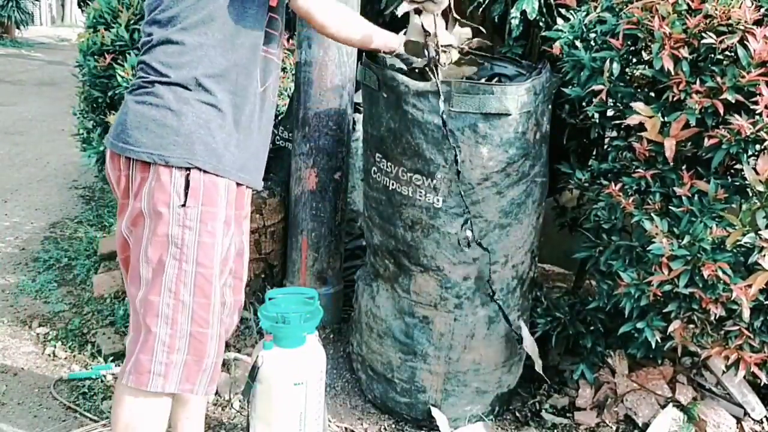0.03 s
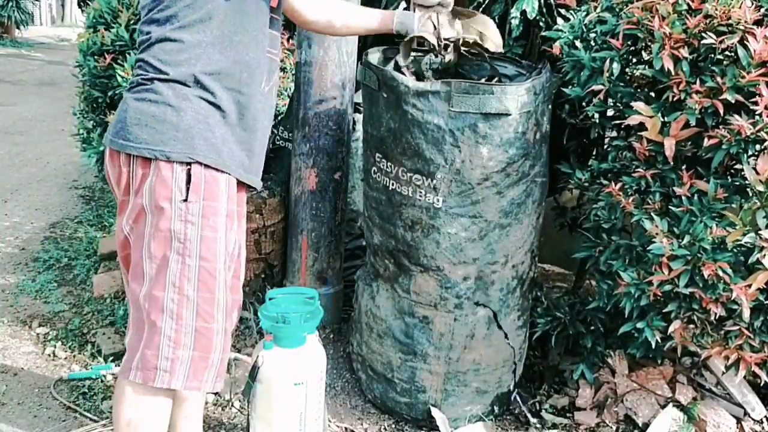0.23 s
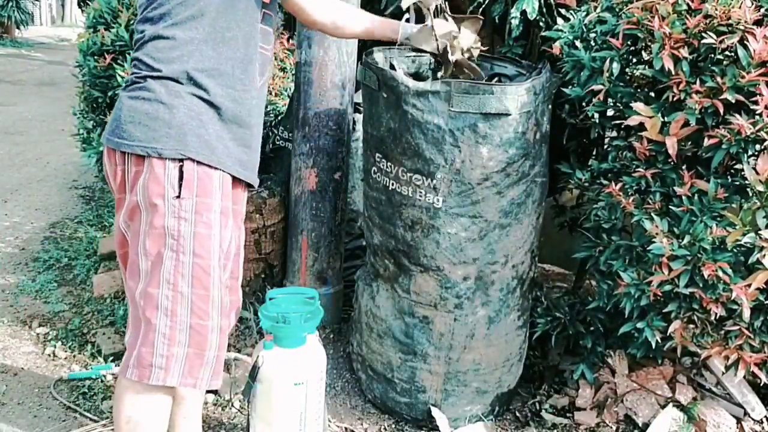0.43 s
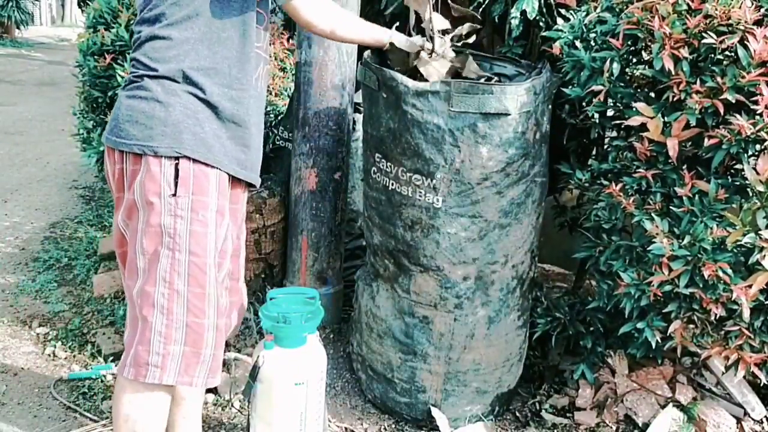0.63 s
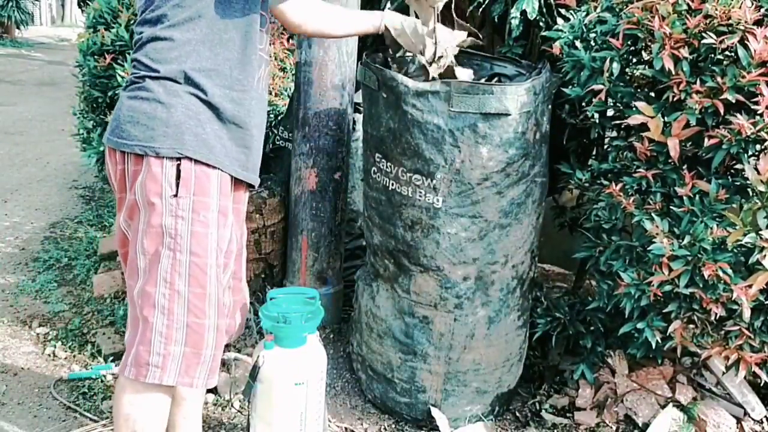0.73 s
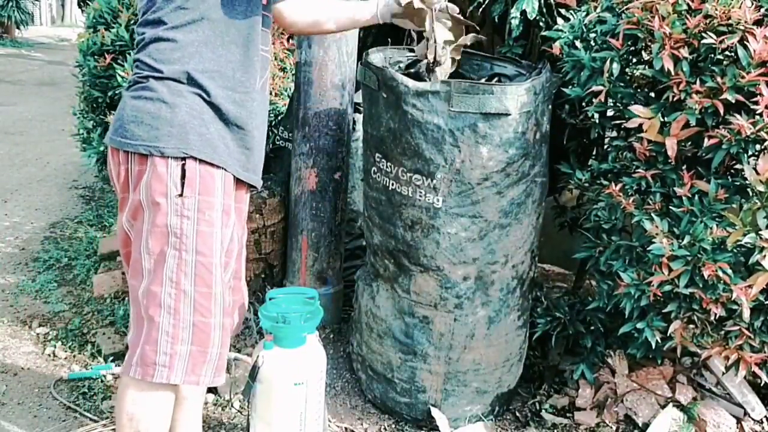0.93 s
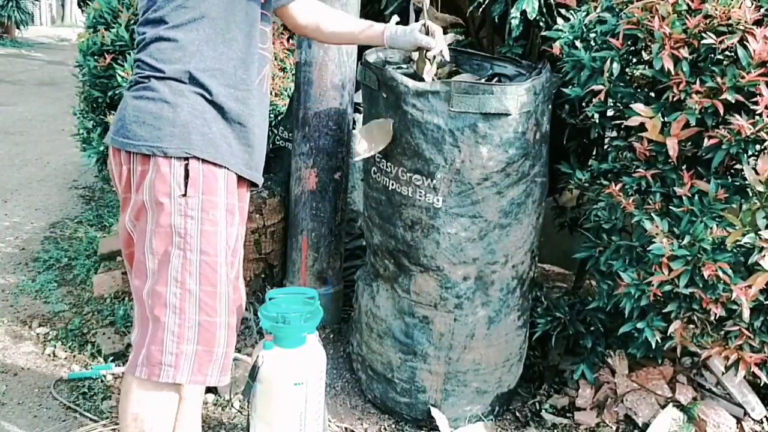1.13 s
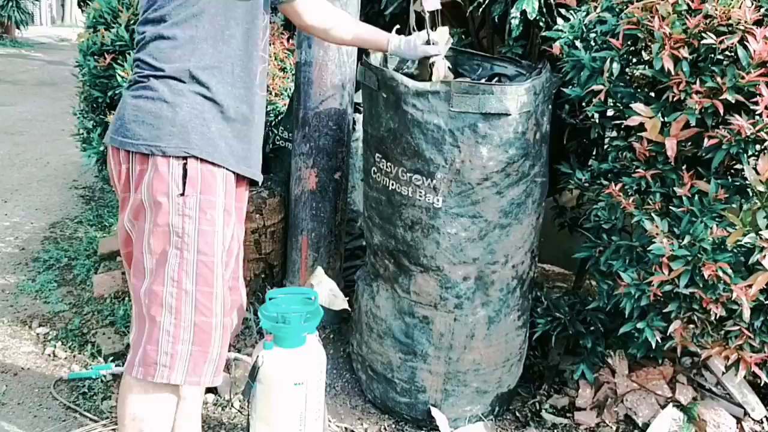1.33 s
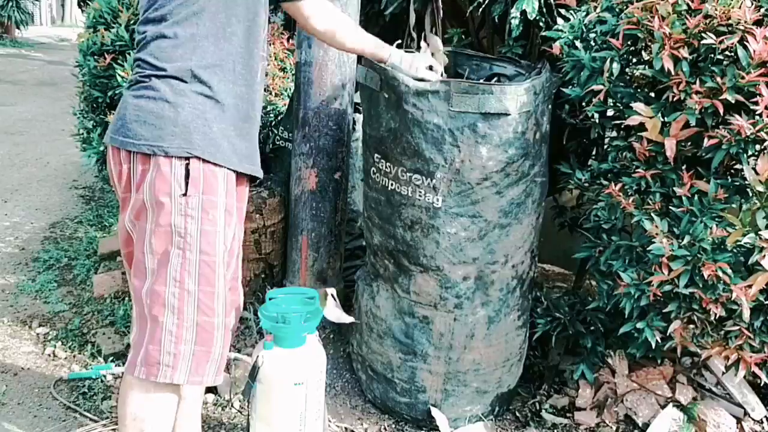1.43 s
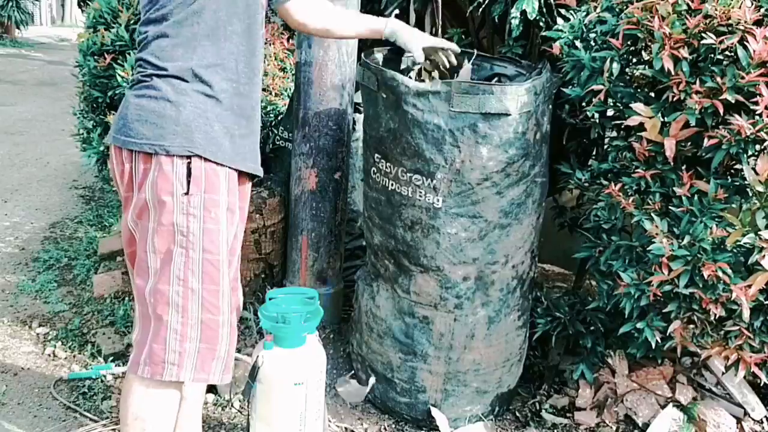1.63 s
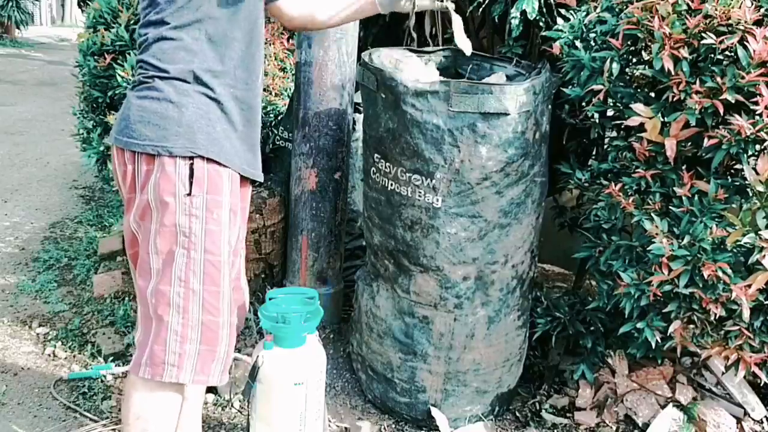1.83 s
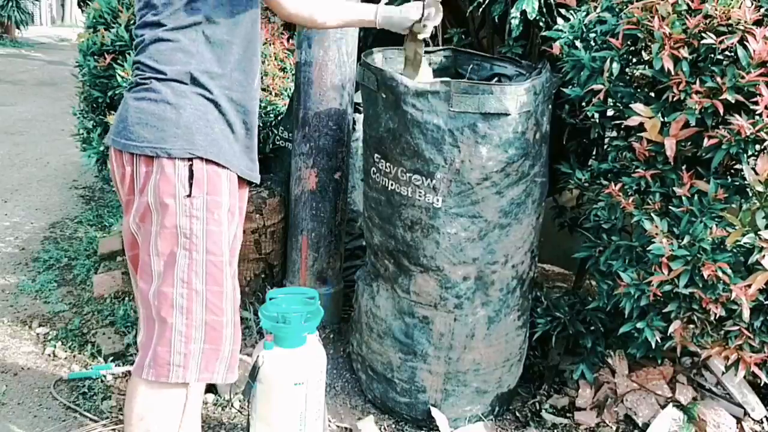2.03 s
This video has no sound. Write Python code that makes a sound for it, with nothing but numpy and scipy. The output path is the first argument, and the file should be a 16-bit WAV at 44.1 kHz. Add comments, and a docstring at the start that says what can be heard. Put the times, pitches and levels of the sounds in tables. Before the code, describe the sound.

Crisp dry leaves crackle and snap in uneven bursts while being stuffed into a garden bag

```python
"""Leaves into a garden bag

Outdoors, a couple of metres away, a hand pushes dry leaves into a tall fabric bag.
The rustle is a dense bed of random ticks and ringing crackles whose level follows each push.
Snaps are filtered pulses with splinters, crunches are bursts of fractures, stalk knocks are decaying modes.
The bag's wall scuffs dully as resonant jerks; the yard answers, over a low rumble of coloured noise."""
import sys
import numpy as np
from scipy import signal
from scipy.fft import rfft, irfft, next_fast_len
from scipy.io import wavfile
from scipy.ndimage import map_coordinates

SR = 44100
rng = np.random.default_rng(int(sys.argv[2]) if len(sys.argv) > 2 else 0)


def transcribe(signal):
    """Save signal, clipped to [-1, 1], as a 16-bit WAV file at the path in sys.argv[1]."""
    frames = np.atleast_2d(signal).T
    limited = np.clip(frames, -1, 1)
    pcm = np.round(limited * 32767).astype(np.int16)
    wavfile.write(sys.argv[1], SR, pcm)


N = 92433  # length in samples

# the hand's pushing: t/s, rustle level/dB, crispness (fine treble against the rustle level)/dB
PUSHES = [(0, -36.5, -4), (.05, -41.5, -6.5), (.14, -43, -5), (.225, -45.5, -8), (.275, -41, -7),
          (.32, -43, -10), (.37, -40.5, -12), (.45, -40.5, -7), (.49, -38, -6), (.555, -34.5, -1),
          (.598, -42, -5), (.62, -35.5, -7), (.638, -40.5, -7), (.655, -36, -4), (.685, -36, -3),
          (.705, -38.5, -4), (.74, -37, -6), (.78, -44.5, -5.5), (.83, -42, -10.5), (.89, -48, -10),
          (.97, -52.5, -5), (1, -41, -5), (1.025, -39.5, -8), (1.05, -41.5, -6.5), (1.11, -42.5, -11.5),
          (1.135, -42, -6.5), (1.22, -47.5, -6.5), (1.315, -47.5, -6), (1.335, -36.5, -5.5),
          (1.385, -36, -1.5), (1.425, -36.5, -7), (1.46, -40.5, -5.5), (1.505, -47.5, -8.5),
          (1.555, -39.5, -10), (1.62, -44.5, -9.5), (1.675, -48, -9.5), (1.705, -46, -11), (1.75, -50, -10),
          (1.83, -51.5, -10.5), (1.915, -59, -6), (1.955, -48.5, -11), (2.005, -51.5, -7), (2.1, -48.5, -3)]
# spectrum of the leaf body: f/Hz, relative level/dB
BODY_COLOUR = [(100, -32), (250, -15.5), (450, -11.5), (600, -7.5), (800, -10), (1050, -4.5), (1700, -2),
               (2600, -1), (3200, -4.5), (3800, -5.5), (5500, -11), (7000, -17), (15000, -42.5)]
# spectrum of the crisp top: f/Hz, relative level/dB
CRISP_COLOUR = [(1500, -26), (4000, -8.5), (5700, -1), (7000, -5), (8600, 2), (10200, -5.5), (13000, -12),
                (15200, -16), (16000, -30)]
# leaves and stalks that break: t/s, level/dB, f/Hz, ring Q,
# bright crack against the break/dB, splinter weight/dB
BREAKS = [(.1922, -30, 2440, 1.5, -1, -2), (.4278, -17.5, 3050, 2, -10, -3),
          (.4551, -25.5, 2390, 2, -8, -3), (.5028, -21, 2800, 2, -11, -9), (.5298, -23, 3200, 2.5, -9, -7),
          (.5627, -14, 2700, 1.1, -6, -12), (.5741, -18.5, 2900, 1.6, 4, -1.5),
          (.5841, -26, 3700, 2, 6, -3), (.6089, -14.5, 1720, 3.2, -3, -8), (.6156, -21, 3000, 1.8, 0, -4),
          (.647, -19, 2600, 1, 0, -5), (.6593, -19, 2000, 3, -11, -4), (.6705, -22.5, 2400, 2, -3, -3),
          (.9408, -34, 4400, 4, -11, 4), (.982, -24, 3600, 4, -3, -1), (1.0183, -24, 2390, 1.5, -12, -3),
          (1.0603, -25, 2900, 2.5, -10, 0), (1.093, -28, 3400, 4, -12, -5),
          (1.182, -10.5, 4200, 2.2, -3, -10), (1.3307, -26, 2820, 2, -9, -2.5),
          (1.3768, -7.5, 3800, 2, -9, -7), (1.4045, -14, 3400, 2.3, -6.5, -4),
          (1.421, -21, 3100, 2, -8.5, -7), (1.5304, -26.5, 3130, 2, -4, 7),
          (1.5344, -9, 1950, 1.1, -16, -11), (1.6622, -30, 1323, 1.2, -20, -1),
          (1.7295, -37, 2500, 3, -15, -2), (1.783, -42, 3550, 10, -18, 2), (1.827, -35.5, 3650, 8, -18, 1),
          (1.837, -41, 3000, 3, -15, -3), (1.8951, -32.5, 3000, 1.2, -5, 1), (1.9363, -36, 2390, 2, -17, 0),
          (2.0235, -39, 3500, 3, -14, -3), (2.0379, -28.5, 2900, 2, -8, 0), (2.044, -34, 2500, 7, -9, -3),
          (2.0788, -33.5, 3300, 2, -5.5, -3.5), (2.0895, -33, 3300, 4, -12, -4),
          (2.0934, -32, 1800, 2, -11, -6)]
# one blade crumples in a run of fractures: loudest moment t/s, rise/s, fade to -20 dB/s, level/dB, f/Hz
BLADE_CRUNCHES = [(.281, .03, .04, -42, 2900), (.362, .018, .025, -40, 2400), (.547, .004, .015, -34, 3300),
                  (.645, .003, .018, -28, 1800), (.660, .002, .009, -29, 1900),
                  (.672, .005, .014, -28.5, 2200), (.683, .002, .014, -30, 1700),
                  (1.003, .008, .006, -34, 2400), (1.022, .004, .008, -32, 2500),
                  (1.032, .003, .014, -35, 2600), (1.135, .012, .02, -39, 2600),
                  (1.4745, .0025, .012, -30, 1700), (1.705, .003, .02, -42, 1900),
                  (1.894, .004, .008, -41, 2900), (1.962, .015, .02, -47, 2900),
                  (2.04, .003, .015, -43, 2800), (.495, .02, .025, -39, 3000)]
# scuffs of the bag's wall: start t/s, rise/s, hold/s, fade to -20 dB/s, level/dB, f/Hz, Q
WALL_SCUFFS = [(.02, .03, .04, .13, -54, 450, 1), (.171, .003, .012, .06, -43, 320, 1.1),
               (.195, .035, .04, .22, -42.5, 320, 1.1), (.315, .012, .04, .42, -47, 330, 1),
               (.638, .0115, .035, .12, -46, 560, 1.5), (.84, .0133, .0286, .12, -52, 400, 1),
               (.995, .05, .03, .15, -45, 520, 1.2), (1.207, .0112, .04, .43, -55, 600, 2.5),
               (1.373, .023, .06, .0066, -52, 618, 1.5), (1.59, .035, .035, .1, -49, 470, .8),
               (1.68, .02, .035, .03, -53.5, 350, 1.2), (1.885, .01, .02, .1, -61, 520, 1.5),
               (1.99, .03, .04, .12, -58, 600, 3)]
# a thick stalk knocks: t/s, level/dB
STALK_KNOCKS = [(1.4730, -37), (1.5347, -26), (1.5540, -34.5)]
# modes of the stalk: f/Hz, level/dB, t60/s
STALK_MODES = [(862.7, -6, 0.0323), (1064, -2, 0.0216), (1325, -1, 0.025), (1503, 0, 0.028),
               (2090, 0, 0.018), (2364, -5.5, 0.022), (2626, 2.5, 0.027), (2842, -2.5, 0.017),
               (4520, -8.5, 0.0173)]
# resonances of the hollow bag: f/Hz, width/Hz, level/dB
BAG_HOLLOW = [(285, 25, -2), (339.8, 11.8, -7), (424.1, 22, -3.5), (581.6, 31.5, -5), (655, 45, -3),
              (855.2, 32.2, -3), (1339.5, 47.6, -7), (1506.6, 41.2, -11), (1855, 21.3, -12),
              (2770, 34, -14), (3634, 63, -6.5), (3993, 25.7, -11.5)]
# spectrum of the outdoor rumble: f/Hz, relative level/dB
RUMBLE_COLOUR = [(20, -36), (50, -24), (75, -13), (110, 1), (155, 0.5), (210, -7), (400, -19), (700, -27),
                 (1200, -21.5), (4000, -32.5), (15000, -52)]
# swell of the rumble: t/s, level/dB
RUMBLE_SWELL = [(0, -55), (.17, -49.5), (.42, -50), (.51, -57), (.72, -60), (.79, -50), (1.1, -51.5),
                (1.27, -55.5), (1.36, -48), (1.44, -55), (1.55, -58), (1.63, -51.5), (1.98, -49.5),
                (2.1, -54)]

GRAINS_PER_S, GRAIN_SPREAD_DB = 7000, 2.2  # coarse ticks of the body
FINE_PER_S, FINE_SPREAD_DB = 9000, 2.6  # fine ticks of the crisp top
BODY_DB, CRISP_DB = -1.5, 1  # weights in the rustle
CLUMP_DB, CLUMP_PER_S = 1.5945, 110  # leaves catch and let go in clumps
FLICKER_DB, FLICKER_PER_S = 1.19, 150  # the crisp top flickers
CRACKLES_PER_S, CRACKLE_DB, CRACKLE_SPREAD_DB = 1500, -4.3, 2
CRACKLE_HZ, CRACKLE_OCTAVES, CRACKLE_CYCLES = 2700, .55, 5  # middle pitch, scatter, cycles to fade to 1/e
BODY_WIDTH, CRISP_WIDTH, SNAP_WIDTH = 0.542, 0.775, 0.263  # side over mid
SPLINTER_S, SPLINTER_FADE_S = .011, 0.00485  # how long splinters follow, how fast they weaken (to 1/e)
CRACK_HZ, CRACK_Q = 8900, 2.2  # the bright crack of a break
SNAP_LOW_CUT = .45  # a small blade radiates little below this share of its pitch
SNAP_TOP_HZ = 10000  # the break is not infinitely sharp
CRUNCH_Q = 1.1
KNOCK_ATTACK_S, KNOCK_SCATTER_DB = 0.00049, 1.72
YARD_T60, YARD_DB, YARD_DELAY_S = 0.152, -10, .002  # scatter from the ground, post and hedge
MIC_DIP_HZ, MIC_DIP_Q, MIC_DIP_DEPTH = 7250, 5, .4  # depth as a share of the amplitude
TOP_HZ = 15500  # band limit


def amp(db):
    """Amplitude factor of a level in dB."""
    return 10 ** (np.asarray(db) / 20)


def unit(x):
    """Scale to rms 1."""
    return x / np.sqrt(np.mean(x ** 2) + 1e-20)


def curves(rows):
    """One value per sample for each column after the time."""
    s, *cols = np.transpose(rows)
    return [np.interp(np.arange(N) / SR, s, c) for c in cols]


def wobble(rate):
    """A smooth random curve, rate knots a second."""
    return map_coordinates(rng.standard_normal(2048), [np.arange(N) * rate / SR], mode="wrap")


def filtered(x, response):
    """x times a complex response of frequency."""
    n = x.shape[-1]
    m = next_fast_len(n + 4096)
    return irfft(rfft(x, m) * response(np.fft.rfftfreq(m, 1 / SR)), m)[..., :n]


def resonance(hz, q):
    """Response of one damped resonance, 1 at its peak."""
    return lambda f: 1j * f * hz / q / (hz * hz - f * f + 1j * f * hz / q)


def coloured(x, points, size=2048):
    """Causal minimum-phase filter through the f/Hz, level/dB points."""
    hz, db = np.transpose(points)
    f = np.fft.rfftfreq(size, 1 / SR)
    level_db = np.interp(np.log(f + 1), np.log(hz), db)
    # folding the cepstrum forward in time makes the filter causal
    cepstrum = irfft(np.log(amp(level_db)))
    cepstrum[1:size // 2] *= 2
    cepstrum[size // 2 + 1:] = 0
    impulse = irfft(np.exp(rfft(cepstrum)))
    return signal.fftconvolve(x, impulse[None], axes=1)[:, :N]


def stereo(pair, width):
    """Left and right from a middle and a side signal."""
    mid, side = pair
    return np.array([mid + width * side, mid - width * side])


def ticks(per_s, spread_db, width, size=N):
    """Tiny fractures at random moments, mostly weak, each at its own place, rms 1."""
    strength = amp(spread_db * np.minimum(rng.exponential(size=size), 5)) * rng.choice([-1, 1], size)
    hits = strength * (rng.random(size) < per_s / SR)
    return unit(stereo([hits, hits * rng.standard_normal(size)], width))


def rustle():
    """Leaves rub: coarse ticks and crackles give the body, fine ticks the crisp top, all led by the push."""
    level_db, crisp_db = curves(PUSHES)
    level_db = level_db + CLUMP_DB * wobble(CLUMP_PER_S)
    grains = unit(coloured(ticks(GRAINS_PER_S, GRAIN_SPREAD_DB, BODY_WIDTH), BODY_COLOUR))
    body = amp(BODY_DB) * grains + amp(CRACKLE_DB) * crackles()
    fine = unit(coloured(ticks(FINE_PER_S, FINE_SPREAD_DB, CRISP_WIDTH), CRISP_COLOUR))
    fine_db = CRISP_DB + crisp_db + FLICKER_DB * wobble(FLICKER_PER_S)
    return amp(level_db) * (body + amp(fine_db) * fine)


def crackles(size=256, count=6000):
    """Single leaves tick as brief decaying sines, each at its own pitch and place, rms 1."""
    when, strength = rng.random(count), rng.exponential(size=count)
    pitch, place = rng.standard_normal(count), rng.standard_normal(count)
    start = (when * count / CRACKLES_PER_S * SR).astype(int)
    heard = start < N
    hz = np.minimum(CRACKLE_HZ * 2 ** (CRACKLE_OCTAVES * pitch[heard, None]), TOP_HZ)
    cycles = hz * np.arange(size) / SR
    envelope = np.exp(-cycles / CRACKLE_CYCLES) * (1 - np.exp(-cycles))
    # the root of the pitch makes up for the shorter ring of high ticks
    ring = np.sin(2 * np.pi * cycles) * envelope * np.sqrt(hz)
    ring *= amp(CRACKLE_SPREAD_DB * strength[heard, None])
    at = (start[heard, None] + np.arange(size)).ravel()
    pair = [np.bincount(at, r.ravel(), N)[:N] for r in (ring, ring * place[heard, None])]
    return unit(stereo(pair, BODY_WIDTH))


def snaps(size=2048, count=24):
    """Each break is one sharp pulse and a spray of weakening splinters that ring the leaf briefly."""
    out = np.zeros((2, N + 2 * size))
    for s, db, hz, leaf_q, crack_db, splinter_db in BREAKS:
        after = SPLINTER_S * rng.random(count) ** 1.3  # crowded towards the break
        fading = np.exp(-after / SPLINTER_FADE_S)
        sizes = .5 * amp(splinter_db) * fading * rng.choice([-1, 1], count)
        at = np.minimum(after * SR, size - 1).astype(int)
        mid = np.bincount(at, sizes, size)
        mid[0] = 1  # the break itself
        side = np.bincount(at, 2 * sizes * rng.standard_normal(count), size)
        side[2] += 1
        force = stereo([mid, side], SNAP_WIDTH)
        for ring_hz, q, gain_db in [(hz, leaf_q, db), (CRACK_HZ, CRACK_Q, db + crack_db)]:
            def ring(f):
                low_cut = f ** 2 / (f ** 2 + (SNAP_LOW_CUT * ring_hz) ** 2)
                high_cut = 1 / (1 + (f / SNAP_TOP_HZ) ** 4)
                return resonance(ring_hz, q)(f) * resonance(ring_hz, .45)(f) * low_cut * high_cut
            peak = np.abs(filtered(signal.unit_impulse(size), ring)).max()
            out[:, round(s * SR):][:, :size] += amp(gain_db) * filtered(force, ring) / peak
    return out[:, :N]


def crunches(size=4096):
    """Dense fractures swell and die away in one blade, coloured by its broad resonance."""
    t, out = np.arange(size) / SR, np.zeros((2, N + size))
    for s, rise, fade, db, hz in BLADE_CRUNCHES:
        shape = np.minimum(t / rise, 1) * amp(-20 * np.maximum(t - rise, 0) / fade)
        blade = lambda f: resonance(hz, CRUNCH_Q)(f) * resonance(hz, .3)(f)
        fractures = unit(filtered(ticks(per_s=9000, spread_db=1, width=.45, size=size), blade))
        out[:, round((s - rise) * SR):][:, :size] += amp(db) * shape * fractures
    return out[:, :N]


def knocks():
    """A stalk strikes and its modes ring briefly, woody and lower than the leaves."""
    t, out = np.arange(N) / SR, np.zeros(N)
    for s, db in STALK_KNOCKS:
        age = np.maximum(t - s, 0)
        attack = 1 - np.exp(-age / KNOCK_ATTACK_S)
        for hz, mode_db, t60 in STALK_MODES:
            swing = np.sin(2 * np.pi * (hz * age + rng.random()))
            level_db = db + mode_db + rng.normal(0, KNOCK_SCATTER_DB) - 60 * age / t60
            out += amp(level_db) * attack * swing
    return out


def bag():
    """The stiff fabric slips in small jerks that sound its slack wall."""
    t, out = np.arange(N) / SR, np.zeros((2, N))
    for s, rise, hold, fade, db, hz, q in WALL_SCUFFS:
        fading = amp(-20 * np.maximum(t - s - rise - hold, 0) / fade)
        shape = np.clip((t - s) / rise, 0, 1) * fading
        wall = lambda f: resonance(hz, q)(f) * resonance(hz, .7)(f)
        jerks = ticks(per_s=2000, spread_db=1.2, width=0.287)
        out += amp(db) * shape * unit(filtered(jerks, wall))
    return out


def hollow(x):
    """The direct sound plus the resonances of the open bag."""
    return filtered(x, lambda f: 1 + sum(amp(db) * resonance(hz, hz / width)(f) for hz, width, db in BAG_HOLLOW))


def yard(x, size=8192):
    """Nearby surfaces scatter a short diffuse answer: convolution with decaying stereo noise."""
    t = np.arange(size) / SR
    noise = stereo(rng.standard_normal((2, size)), width=1.0)
    tail = noise * amp(-60 * t / YARD_T60) * (t > YARD_DELAY_S)
    return signal.fftconvolve(x, tail / np.linalg.norm(tail[0]), axes=1)[:, :N]


def rumble():
    """Low, nearly mono outdoor noise that swells and sinks."""
    level_db, = curves(RUMBLE_SWELL)
    noise = stereo(rng.standard_normal((2, N)), width=0.251)
    return amp(level_db) * unit(coloured(noise, RUMBLE_COLOUR))


def scene():
    """Leaves and bag in the yard, over the rumble."""
    in_bag = rustle() + crunches() + snaps() + bag()
    near = hollow(in_bag) + knocks()
    return near + amp(YARD_DB) * yard(near) + rumble()


def record(dry):
    """The microphone dips in the treble, and a steep roll-off closes the top at the band limit."""
    heard = filtered(dry, lambda f: 1 - MIC_DIP_DEPTH * resonance(MIC_DIP_HZ, MIC_DIP_Q)(f))
    return filtered(heard, lambda f: 1 / (1 + (f / TOP_HZ) ** 120))


dry = scene()
out = record(dry)
transcribe(out)
```